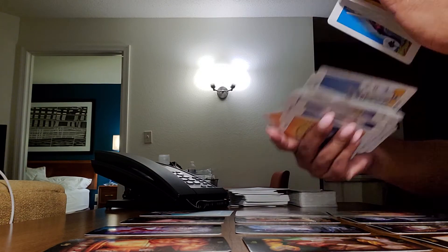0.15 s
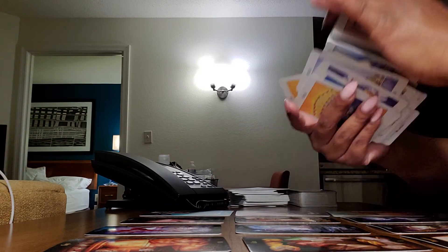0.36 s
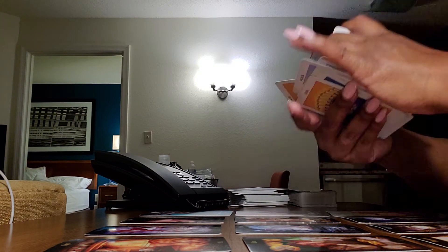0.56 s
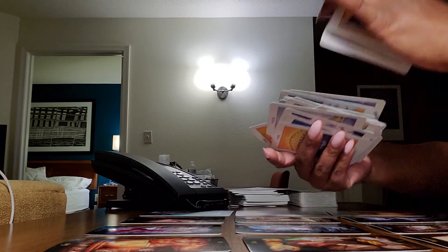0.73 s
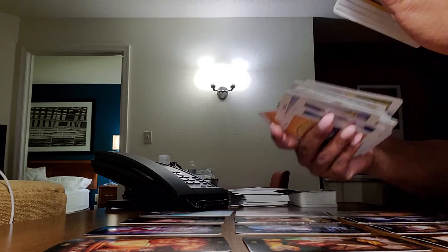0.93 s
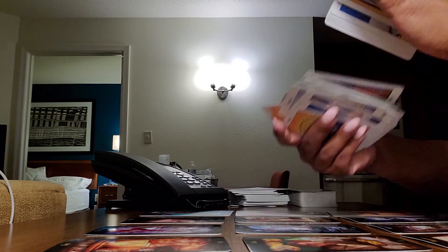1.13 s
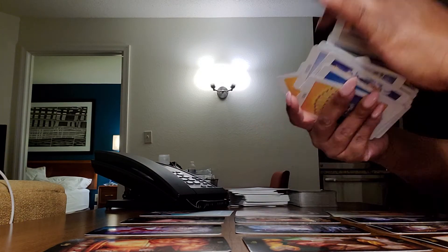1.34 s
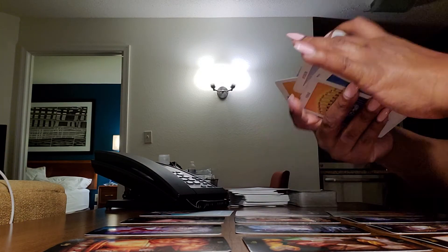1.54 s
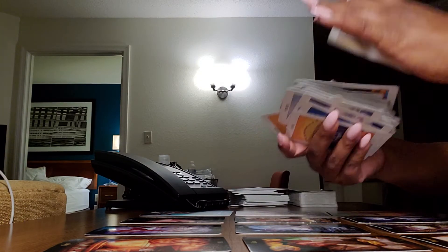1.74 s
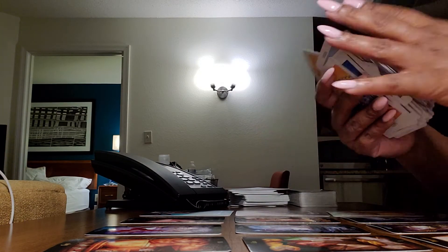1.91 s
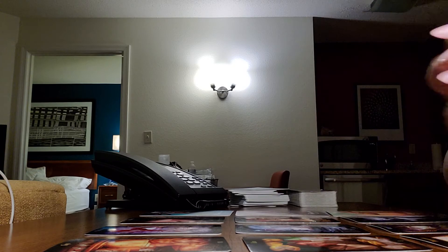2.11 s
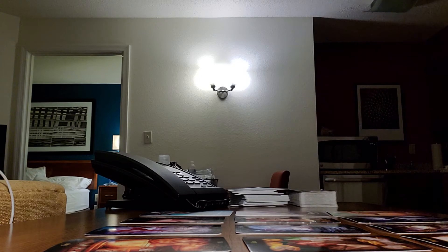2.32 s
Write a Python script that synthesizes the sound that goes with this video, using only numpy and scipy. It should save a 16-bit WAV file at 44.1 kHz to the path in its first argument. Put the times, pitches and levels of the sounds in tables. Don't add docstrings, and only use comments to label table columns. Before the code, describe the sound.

Stiff cards shuffled overhand, crisp snaps and papery scrapes four times a second, close right, quiet room

```python
import sys
import numpy as np
from scipy import signal
from scipy.fft import rfft, irfft, next_fast_len
from scipy.io import wavfile
from scipy.ndimage import uniform_filter1d, map_coordinates

SR = 44100
rng = np.random.default_rng(int(sys.argv[2]) if len(sys.argv) > 2 else 0)


def transcribe(u):
    v = np.clip(np.atleast_2d(u).T, -1, 1)
    q = np.round(v * 32767).astype(np.int16)
    wavfile.write(sys.argv[1], SR, q)


def boost_factor(decibels):
    exponent = np.asarray(decibels, float) / 20
    return 10 ** exponent


N = 108838
TIME = np.arange(N) / SR


def unit(x):
    return x / np.sqrt(np.mean(x ** 2) + 1e-20)


def along(points, hz):
    f, v = np.transpose(points)
    return np.interp(np.log(hz + 1), np.log(f + 1), v)


def wobble(rate):
    knots = rng.standard_normal(int(N * rate / SR) + 4)
    return map_coordinates(knots, [np.arange(N) * rate / SR])


def filtered(x, response):
    m = next_fast_len(N + SR // 2)
    return irfft(rfft(x, m) * response(np.fft.rfftfreq(m, 1 / SR)), m)[..., :N]


def noise(spectrum):
    return unit(filtered(rng.standard_normal(N), lambda hz: boost_factor(along(spectrum, hz))))


def patchy(x, depth_db):
    z = signal.stft(x, nperseg=128)[2]
    field = uniform_filter1d(rng.standard_normal(z.shape), size=3, axis=0)
    field = uniform_filter1d(field, size=3, axis=1)
    return unit(signal.istft(z * boost_factor(depth_db * unit(field)), nperseg=128)[1][:N])


def paired(pair, alike):
    def turn(hz):
        return np.arccos(np.clip(along(alike, hz), -1, 1)) / 2

    mid, side = filtered(pair, lambda hz: np.array([np.cos(turn(hz)), np.sin(turn(hz))]))
    return np.array([mid + side, mid - side])


def strokes(starts, stops, dbs, rise_s, fall_s):
    sag = 0.53
    softer = 0.079
    total = 0
    for start, stop, db in zip(starts, stops, dbs):
        length = abs(stop - start)
        swell = np.minimum((TIME - start) / rise_s, 0)
        sagging = sag * np.clip((TIME - start) / length, 0, 1)
        release = np.minimum((stop - TIME) / (fall_s + softer * length), 0)
        total = total + boost_factor(db) * np.exp(swell - sagging + release)
    return total


def hits(rows, rise_s, t60_s, ring, crack_db, colour):
    out, lead = np.zeros(N + SR), 256
    t = (np.arange(4096) - lead) / SR
    swell = np.exp(np.minimum(t, 0) / rise_s)
    decay = boost_factor(-60 * np.maximum(t, 0) / t60_s)
    shape = uniform_filter1d(np.where(t < 0, swell, decay), size=9)
    gain = boost_factor(along(colour, np.fft.rfftfreq(len(t), 1 / SR)))
    for s, db, *pitch in rows:
        crack = shape ** 2 * irfft(rfft(rng.standard_normal(len(t))) * gain)
        modes = 0
        for hz in pitch:
            for k, (ratio, level_db) in enumerate(ring):
                modes = modes + boost_factor(level_db) * np.sin(2 * np.pi * hz * ratio * t + k)
        hit = shape * modes + boost_factor(crack_db) * crack / abs(crack).max()
        out[round(s * SR):][:len(t)] += boost_factor(db) * hit
    return out[lead:lead + N]


# (frequency [Hz], level [dB])
LEFT_OVER_RIGHT = [(60, 0), (700, -1), (1300, -4), (2400, -12.5), (4400, -7.5), (8000, -9.5), (15000, -6.5)]


def lean_right(hz):
    return along(LEFT_OVER_RIGHT, hz) / 4 * np.array([[1], [-1]])


# (frequency [Hz], level [dB])
AIR_SPECTRUM = [(15, -45), (25, -5.5), (118, 4.5), (184, -6.5), (296, -14.5), (400, -18.5), (520, -36),
                (880, -120)]
# (frequency [Hz], level [dB])
HUSH_SPECTRUM = [(260, -34), (450, -6.5), (1300, -11), (3200, -10.5), (16000, -19.5)]
# (time [s], level [dB])
HAND_RUSTLE = [
    (0, -0.5),
    (1.9, 3.5),
    (2.0, -2.5),
    (2.06, -5),
    (2.151, 2),
    (2.47, 3),
]
# (frequency [Hz], likeness [0 to 1])
DIFFUSE_LIKENESS = [(100, 1), (700, 0.65), (1400, 0.024)]


def floor():
    air = paired(np.array([noise(AIR_SPECTRUM), noise(AIR_SPECTRUM)]), DIFFUSE_LIKENESS)
    air = air * boost_factor(-51.5 + 0.35 * wobble(25))
    hush = paired(np.array([noise(HUSH_SPECTRUM), noise(HUSH_SPECTRUM)]), DIFFUSE_LIKENESS)
    rustle_db = np.interp(TIME, *np.transpose(HAND_RUSTLE))
    hush = hush * boost_factor(-67.5 + rustle_db + 0.97 * wobble(3.4))
    return air + filtered(hush, lambda hz: boost_factor(5.0 + lean_right(hz)))


# (start [s], length [s], level [dB])
EDGE_SCRAPES = [(0, 0.044, -57), (0.067, 0.019, -42), (0.09, 0.14, -45), (0.316, 0.05, -44),
                (0.364, 0.06, -39), (0.577, 0.025, -39), (0.61, 0.047, -44), (0.688, 0.017, -33),
                (0.828, 0.057, -41.5), (0.928, 0.026, -38), (1.077, 0.019, -38.5), (1.112, 0.073, -50.5),
                (1.154, 0.049, -39.5), (1.314, 0.037, -53), (1.334, 0.026, -41), (1.398, 0.048, -34.5),
                (1.58, 0.056, -45), (1.652, 0.079, -36.5), (1.675, 0.023, -28.5), (1.852, 0.017, -39),
                (1.883, 0.059, -55), (2.185, 0.018, -59), (2.3, 0.066, -53), (2.359, 0.06, -78)]
# (frequency [Hz], level [dB])
CARD_BODY = [(150, -41.5), (400, -0.5), (1100, -6.5), (1900, -4.5), (2500, -2.5), (3500, -3), (4500, -12.5),
             (16000, -28)]
# (frequency [Hz], level [dB])
CORNER_SPECTRUM = [(1500, -13), (5000, 1), (8000, 7), (10000, 0), (12500, 4.5), (16000, -1)]
SCRAPE_RISE_S, SCRAPE_FALL_S = 0.0017, 0.0026


def scrapes():
    start, length, db = np.transpose(EDGE_SCRAPES)
    edge = patchy(noise(CARD_BODY), 4) + boost_factor(-22.5) * noise(CORNER_SPECTRUM)
    return strokes(start, start + length, db, SCRAPE_RISE_S, SCRAPE_FALL_S) * edge


# (fastest from [s], stop [s], level [dB], lower band [dB re level])
FACE_SLIDES = [(0, 0.034, -64.5, 7), (0.086, 0.088, -47, 9), (0.179, 0.201, -31, -7.5),
               (0.354, 0.37, -41.5, -1), (0.387, 0.44, -65, 20), (0.584, 0.668, -52.5, 3.5),
               (0.677, 0.69, -36, 0), (0.83, 0.905, -58, 4.5), (0.919, 0.943, -44, 3),
               (1.087, 1.147, -56.5, 1.5), (1.169, 1.186, -42, 1), (1.335, 1.37, -55, 1.5),
               (1.386, 1.423, -49, -18), (1.593, 1.6, -48, 2.5), (1.642, 1.684, -43, -5.5),
               (1.861, 1.877, -50.5, 4.5), (2.147, 2.275, -61.5, 1.5), (2.19, 2.228, -51, 6.5),
               (2.314, 2.334, -53.5, 10), (2.353, 2.453, -63, 3)]
# (frequency [Hz], level [dB])
GLOSS_HIGH = [(3000, -31.5), (9500, -11), (12800, 0), (14500, -5.5), (16000, -19)]
# (frequency [Hz], level [dB])
GLOSS_LOWER = [(1500, -17), (7500, -3.5), (8600, -7.5), (10000, -41.5)]


def slides():
    rise_s, fall_s, lumps_db = 0.0039, 0.0034, 2
    start, stop, db, low_db = np.transpose(FACE_SLIDES)
    high = strokes(start, stop, db, rise_s, fall_s) * patchy(noise(GLOSS_HIGH), lumps_db)
    low = strokes(start, stop, db + low_db, rise_s, fall_s) * patchy(noise(GLOSS_LOWER), lumps_db)
    return high + low


# (time [s], peak level [dB], pitch
# [Hz])
EDGE_SNAPS = [(0.0754, -29, 1440), (0.0806, -28.5, 1990), (0.1481, -22, 2020), (0.2025, -23, 1600),
              (0.207, -27, 1460), (0.3275, -21, 1860), (0.3354, -18.5, 1630), (0.3424, -22, 1800),
              (0.3924, -8, 1957), (0.3973, -19.5, 1680), (0.5925, -20, 2210), (0.9286, -30.5, 1380),
              (0.9376, -27, 1330), (1.0767, -22.5, 1770), (1.0816, -27, 1780), (1.1714, -24.5, 2720),
              (1.1764, -22.5, 1950), (1.4011, -30.5, 2840), (1.4201, -25, 1530), (1.658, -24.5, 3647),
              (1.6777, -13.5, 1620), (1.6888, -21.5, 1130), (1.8576, -29.5, 2770),
              (0.5754, -35.5, 1670),
    (0.5888, -28.5, 2030),
    (0.602, -28.5, 1600),
    (2.295, -44.5, 1320),
    (1.1422, -33, 1610),
    (1.1925, -52, 1800),
    (1.888, -40, 2800),
]
# (frequency [Hz], level [dB])
CRACK_SPECTRUM = [(150, -59), (700, 5), (3000, 1.5), (4500, -11), (16000, -30)]


def snaps():
    ring = [(1, 0), (1.3723, -5.5), (2.1, -16)]  # (pitch ratio, dB)
    return hits(EDGE_SNAPS, 0.001, 0.009, ring, -0.5, CRACK_SPECTRUM)


# (time [s], peak level [dB], pitch
# [Hz])
PACKET_SLAPS = [(0.0758, -32.5, 884), (0.2036, -19, 652), (0.3185, -25.5, 570), (0.3922, -26, 676),
                (0.591, -22.5, 753), (0.7019, -30, 464.4), (0.9289, -34, 930), (0.9388, -24.5, 638),
                (0.9452, -27.5, 920), (1.1755, -31, 520), (1.1925, -30.5, 520), (1.4199, -20.5, 664),
                (1.4262, -23, 450), (1.4317, -21.5, 946), (1.6557, -29.5, 720), (1.6784, -11, 705),
                (1.6945, -22, 581), (1.6753, -10, 2040)]


def slaps():
    ring = [(1, 0), (0.46, -18.5), (1.6, -8)]  # (pitch ratio, dB)
    return hits(PACKET_SLAPS, 0.00067, 0.016, ring, -2, CRACK_SPECTRUM)


# (start [s], length [s], level
# [dB], pitch [Hz])
EDGE_CHATTER = [(.14, .02, -33, 2140), (0.36, .02, -50.5, 1694), (.613, .022, -37.5, 2800),
                (0.616, .02, -40, 1940), (.641, .024, -36.5, 1737), (0.675, .01, -44, 1500),
                (0.702, .03, -37, 480), (0.86, .027, -57, 1900), (0.896, .018, -35, 1805),
                (0.955, .03, -45, 649), (1.17, 0.013, -35.5, 2183), (1.393, .01, -36.5, 2870),
                (1.452, .018, -44, 750), (1.74, .015, -51, 1733), (2.2, .02, -53.5, 1307),
                (2.311, .03, -48, 3070), (1.859, .55, -65.5, 225)]


def chatter():
    total = 0
    for s, length, db, hz in EDGE_CHATTER:
        stroke = strokes([s], [s + length], [db], SCRAPE_RISE_S, SCRAPE_FALL_S)
        beating = wobble(0.4 * hz)
        total = total + stroke * beating * np.sin(2 * np.pi * hz * TIME)
    return total


# (time [s], peak level [dB], pitch [Hz], t60 [s])
FACE_RINGS = [(.197, -29, 504, 0.016), (.393, -19.5, 612, 0.017), (1.678, -15, 1128, 0.022),
              (1.6885, -20.5, 670, 0.019), (2.33, -45.5, 334, 0.095), (.1455, -20.5, 1650, .012),
              (.208, -25, 800, .04), (1.1715, -29, 2000, .014), (1.1925, -43, 900, .012),
              (.328, -21, 2860, 0.014), (.328, -20.5, 1120, 0.0059), (.344, -8.5, 1740, 0.011),
              (.344, -20.5, 2780, .012), (.341, -19, 1030, 0.01), (.3995, -21.5, 2200, .01),
              (.412, -33, 1920, 0.017), (.5865, -29, 960, 0.017), (.696, -31.5, 790, 0.015),
              (.7025, -24.5, 1020, 0.01), (.8412, -11, 1670, .014), (.8412, -14, 2072, 0.018),
              (.8415, -17, 3720, 0.0033), (1.339, -30, 1060, .015), (1.3405, -27, 2023, 0.038),
              (1.3405, -29, 1660, 0.024), (1.3405, -30, 3450, .012), (1.4225, -27, 542, 0.036),
              (1.4395, -23.5, 634, 0.011), (1.4395, -31.5, 1800, .012), (1.682, -22.5, 570, 0.018),
              (1.708, -28.5, 804, 0.019), (1.722, -36, 780, 0.033), (1.73, -40.5, 703, 0.018),
              (2.2955, -37, 666, .04), (2.2975, -39, 4200, .012), (2.3205, -37, 259.5, 0.13),
              (2.322, -43.5, 620, 0.068), (2.322, -39, 1260, 0.022), (2.3192, -29.5, 3300, 0.0067),
              (2.454, -48.5, 708, 0.07)]


def rings():
    rise_s, total = 0.00067, 0
    for s, db, hz, t60 in FACE_RINGS:
        t = TIME - s
        decay = boost_factor(db - 60 * np.maximum(t, 0) / t60)
        swell = np.exp(np.minimum(t, 0) / rise_s)
        total = total + decay * swell * np.cos(2 * np.pi * hz * t)
    return total


# (time [s], peak level [dB])
CORNER_TICKS = [(.2028, -22), (.2073, -13.5), (.3186, -32), (.3432, -14.5), (.7015, -21), (.824, -58),
                (.8415, -25), (.9385, -26.5), (.9455, -33), (1.1763, -22.5), (1.1809, -18.5), (1.4205, -20),
                (1.4318, -32), (1.4402, -26.5), (1.6755, -14.5), (1.6785, -17), (1.688, -28.5),
                (1.696, -23), (1.857, -35.5), (2.2978, -21.5)]


def ticks():
    return hits(CORNER_TICKS, 0.0007, 0.012, [], 0, CORNER_SPECTRUM)


# (time [s], peak level [dB])
PALM_THUMPS = [
    (.206, -31),
    (0.344, -37),
    (0.597, -34),
    (.702, -31.5),
    (0.945, -34),
    (1.19, -37),
    (1.43, -31.5),
    (1.686, -24),
]
# (frequency [Hz], level [dB])
PALM_MODES = [(85, -6.5), (220, -4), (430, -7)]


def thumps():
    rows = [(s, db, 1) for s, db in PALM_THUMPS]
    return hits(rows, 0.0095, 0.076, PALM_MODES, -200, CRACK_SPECTRUM)


# (frequency [Hz], share [0 to 1])
STRAIGHT_SHARE = [(600, 0.96), (2000, 1), (4000, 0.22), (12000, 0.15)]


def ports(x):
    lag_s = -6e-5
    t, scattered = np.arange(512) / SR, np.zeros(N + SR)
    for k in range(0, N, len(t)):
        paths = rng.standard_normal(len(t)) * boost_factor(-60 * t / 0.014)
        part = signal.fftconvolve(x[k:k + len(t)], paths / np.linalg.norm(paths))
        scattered[k:k + len(part)] += part

    def share(hz):
        return np.clip(along(STRAIGHT_SHARE, hz), 0, 1)

    def straight_path(hz):
        return boost_factor(along(LEFT_OVER_RIGHT, hz)) * share(hz) * np.exp(-2j * np.pi * hz * lag_s)

    def scattered_path(hz):
        return boost_factor(along(LEFT_OVER_RIGHT, hz)) * np.sqrt(1 - share(hz) ** 2)

    left = filtered(x, straight_path) + filtered(scattered[:N], scattered_path)
    return np.array([left, x]) * boost_factor(3)


# (frequency [Hz], t60 [s])
ROOM_DECAY = [(300, 0.32), (2000, 0.23), (14000, 0.26)]


def room(x):
    out, step, delay = np.zeros((2, N + SR)), SR // 8, 180
    for k in range(0, N, step):
        hz, t, z = signal.stft(rng.standard_normal((2, SR // 2)), SR, nperseg=256)
        decay = boost_factor(-60 * t / along(ROOM_DECAY, hz)[:, None])
        tail = signal.istft(z * decay, SR, nperseg=256)[1]
        wet = signal.fftconvolve(x[None, k:k + step], tail / np.linalg.norm(tail[0]), axes=1)
        out[:, k + delay:k + delay + wet.shape[1]] += wet
    return filtered(paired(out[:, :N], DIFFUSE_LIKENESS), lambda hz: boost_factor(lean_right(hz)))


def scene():
    background = floor()
    friction = scrapes() + slides() + chatter()
    contacts = snaps() + slaps() + ticks() + thumps()
    cards = friction + contacts + rings()
    return ports(cards) + boost_factor(-12.5) * room(cards) + background


def top_cut(x):
    return signal.sosfilt(signal.butter(12, 16970, fs=SR, output="sos"), x)


def record(dry):
    def microphone(hz):
        dip_db = -np.exp(-(np.log((hz + 1) / 9578) / 0.11) ** 2)
        return boost_factor(dip_db) / (1 + (hz / 15850) ** 150)

    return top_cut(filtered(dry, microphone))


dry = scene()
out = record(dry)
transcribe(out)
```